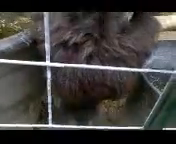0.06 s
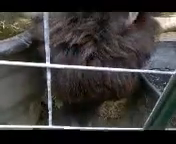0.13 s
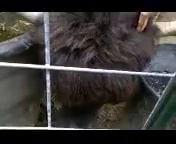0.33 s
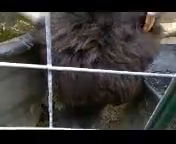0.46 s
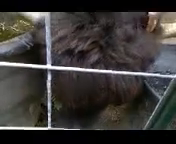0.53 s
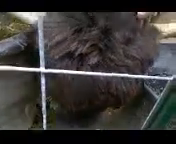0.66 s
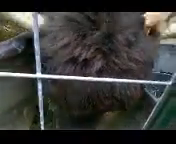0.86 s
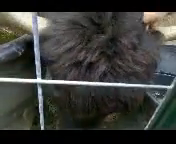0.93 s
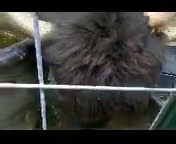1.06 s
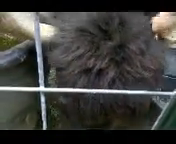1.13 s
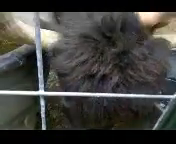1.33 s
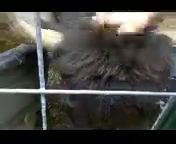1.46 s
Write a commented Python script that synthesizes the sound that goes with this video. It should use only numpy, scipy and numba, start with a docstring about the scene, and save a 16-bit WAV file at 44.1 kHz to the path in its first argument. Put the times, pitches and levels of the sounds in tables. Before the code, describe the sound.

A big animal hoots low and breathily, about four times a second, then fades; a distant shrill screech swells early and returns at the end, with faint chirps, a small knock, rustles and wind over hiss.

```python
"""A steady hiss opens the scene, with a far shrill screech swelling up in it; then a large animal gives four rising
hoots and a faint fifth in a hard-walled yard. Bird chirps, a small knock, rustle, wind puffs and low tones lie around.
Voices are sums of harmonics and gated noise sent through resonances; hiss, rustle, knock and puffs are filtered noise;
decaying noise tails give the yard echo. Two close microphone ports are cross-subtracted for width."""
import sys
import numpy as np
from scipy import signal
from scipy.fft import rfft, irfft, next_fast_len
from scipy.io import wavfile
from scipy.ndimage import uniform_filter1d
from numba import njit

SR = 44100
rng = np.random.default_rng(int(sys.argv[2]) if len(sys.argv) > 2 else 0)


def gain_from_decibels(decibels):
    """Convert decibel values to linear amplitude factors."""
    exponent = np.asarray(decibels, float) / 20
    return 10 ** exponent


def unload_wav(signal):
    """Save mono or channel-first audio to the path in sys.argv[1] as 16-bit WAV at rate SR, clipped to [-1, 1]."""
    wavfile.write(
        sys.argv[1],
        SR,
        np.round(np.clip(np.atleast_2d(signal).T, -1, 1) * 32767).astype(np.int16),
    )


N = 66150  # samples


@njit
def svf(x, hz, width):
    """Second-order resonance: a state-variable band-pass with gain 1 at its centre."""
    y, band, low = np.empty(len(x)), 0., 0.
    g, damping = np.tan(np.pi * hz / SR), width / hz
    for i in range(len(x)):
        v = (band + g * (x[i] - low)) / (1 + g * (g + damping))
        band, low, y[i] = 2 * v - band, low + 2 * g * v, damping * v
    return y


def body(x, table):
    """Modal superposition: resonances side by side (f/Hz, width/Hz, level/dB), each passed twice for steep skirts."""
    out = 0
    for hz, width, db in table:
        once = svf(x, 1. * hz, 1. * width)
        out = out + gain_from_decibels(db) * svf(once, 1. * hz, 1. * width)
    return out


def walk(rate):
    """Band-limited random modulation: levels held 1 / rate s and slewed twice; spread near 1."""
    k = int(SR / rate)
    held = np.repeat(rng.standard_normal(N // k + 1), k)
    return 1.3 * uniform_filter1d(uniform_filter1d(held, k), k)[:N]


def phase(hz, depth, rate):
    """Frequency modulation: phase in radians as the integral of a randomly wavering pitch."""
    return 2 * np.pi * np.cumsum(hz * (1 + depth * walk(rate))) / SR


def column(rows, index):
    """Piecewise-linear contour: one column of a time table, joined by straight lines."""
    rows = np.array(rows, float)
    return np.interp(np.arange(N) / SR, rows[:, 0], rows[:, index])


def bump(start, length):
    """Raised-cosine envelope: a smooth swell and fall (both arguments in s)."""
    return np.sin(np.pi * np.clip((np.arange(N) / SR - start) / length, 0, 1)) ** 2


# spectral density of the hiss common to both ports, and of that unlike between them
# columns: f/Hz, nominal level/(dB per Hz)
COMMON_HISS = [(25, -113), (60, -89), (125, -81), (180, -70.5), (250, -86.5), (500, -95.5), (1000, -100),
               (2000, -108), (4000, -107), (8000, -106), (10500, -105), (13500, -107)]
UNLIKE_HISS = [(25, -108), (60, -104), (125, -104), (250, -106), (500, -104), (1000, -107), (2000, -108),
               (4000, -108), (8000, -108), (10500, -108), (13500, -108)]


def hiss(table):
    """Filtered random noise: half-octave bands that swell together and flicker alone."""
    out, swell, table = 0, walk(1.545), np.array(table, float)
    for hz in 25 * 2 ** np.arange(0, 9.3, .5):
        density_db = np.interp(np.log(hz), np.log(table[:, 0]), table[:, 1])
        db = density_db + 2.0 * swell + 1.2 * walk(10.34)
        out = out + gain_from_decibels(db) * body(rng.standard_normal(N), [(hz, hz / 2, 0)])
    return out * np.sqrt(SR / 2)  # from density to full-band noise


# low puffs of wind; columns: centre t/s, length/s, f/Hz, relative level/dB
PUFFS = [(0.137, 0.057, 90, -49), (0.424, 0.086, 95, -43), (.49, 0.083, 55, -48), (0.997, 0.092, 90, -48),
         (1.17, 0.27, 93, -54), (1.31, .07, 130, -53), (1.357, 0.14, 110, -57.5)]


def puffs():
    """Flow noise: swells of low band-passed noise."""
    out = 0
    for centre, length, hz, db in PUFFS:
        rumble = body(rng.standard_normal(N), [(hz, hz, 20)])
        out = out + gain_from_decibels(db) * bump(centre - length / 2, length) * rumble
    return out


# short wavering tones; columns: start t/s, length/s, mean f/Hz, mean peak level/dB
HUMS = [(0, 0.21, 240, -59.5), (0.037, 0.2, 1009, -70), (0.369, 0.28, 1036, -62.5), (1.292, 0.17, 716, -70),
        (0.231, 0.12, 180, -52), (1.223, 0.091, 535, -52.5)]


def hums():
    """Narrow-band random modulation: short low tones far off waver in pitch and level."""
    out = 0
    for start, length, hz, db in HUMS:
        level = gain_from_decibels(db + 3.7 * walk(24.5)) * bump(start, length)
        out = out + level * np.cos(phase(hz, 0.01473, 25.15))
    return out


# bird chirps; columns: start t/s, length/s, mean f/Hz, mean peak level/dB
CHIRPS = [(0.715, 0.11, 7570, -63), (0.881, 0.096, 7700, -64), (0.886, 0.052, 8300, -63.5),
          (1.133, .06, 7600, -67), (1.15, .04, 8600, -74)]


def chirps():
    """Sinusoidal tone bursts, fluttering fast in pitch and level."""
    out = 0
    for start, length, hz, db in CHIRPS:
        level = gain_from_decibels(db) * bump(start, length) * gain_from_decibels(4.6 * walk(400))
        out = out + level * np.cos(phase(hz, 0.03, 700))
    return out


# contacts of the knock; columns: centre t/s, relative level/dB
KNOCKS = [(0.7954, -45), (0.7995, -47), (0.806, -40), (0.81, -52)]
# what the contacts ring with; columns: f/Hz, width/Hz, level/dB
KNOCK_BODY = [(1530, 650, -1), (2000, 530, -12), (4650, 2700, -11), (7000, 2800, -13)]


def knock():
    """Impulsive excitation of modes: soft noisy contacts make broad resonances ring."""
    contact_s = 0.0023
    ticks, scrape = np.zeros(N), rng.standard_normal(N)
    for centre, db in KNOCKS:
        ticks += 3.3 * gain_from_decibels(db) * bump(centre - contact_s / 2, contact_s) * scrape
    return body(ticks, KNOCK_BODY)


# rustles in the treble; columns: start t/s, length/s, relative level/dB
RUSTLES = [(0.41, 0.11, -55), (0.59, 0.097, -53.5), (0.796, 0.054, -54.5), (0.963, 0.035, -56),
           (1.211, 0.035, -52), (1.234, 0.098, -48), (1.315, 0.038, -55), (1.475, 0.042, -52)]


def rustle():
    """Amplitude-modulated noise: gritty treble in separate swells."""
    grit = rng.standard_normal(N) * gain_from_decibels(1.5 * walk(300))
    swells = sum(gain_from_decibels(db) * bump(start, length) for start, length, db in RUSTLES)
    return body(grit, [(13930, 20000, 0)]) * swells


# contour of the screech; columns: t/s, pitch f/Hz, relative level/dB
SCREECH = [(0, 1171, -79), (.04, 1175, -67), (.15, 1185, -66.5), (.22, 1213, -64), (.3, 1220, -63),
           (.4, 1255, -66.5), (.52, 1233, -72.5), (.64, 1244, -78), (1.17, 1408, -84), (1.2, 1326, -73.5),
           (1.23, 1191, -65.5), (1.35, 1215, -64), (1.43, 1217, -64), (1.5, 1254, -60.5)]
# its harmonics; columns: order, mean level/dB
SCREECH_ORDERS = [(1, -14), (2, -4.5), (3, -5), (4, -6), (5, 1.5), (6, -8.5)]
# its breath bands; columns: f/Hz, width/Hz, relative level/dB
SCREECH_BREATH = [(2667, 580, -6.5), (3805, 540, -5.5), (4786, 2020, -9), (6300, 450, -5),
                  (7105, 1940, -9.5)]


def screech():
    """Harmonic series with sidebands: fast amplitude modulation puts rasp around each line, with breath noise added."""
    jitter, rasp_db = 0.012, -7.5
    turn = phase(column(SCREECH, index=1), jitter, 60)
    stack = 0
    for order, db in SCREECH_ORDERS:
        rasp = 1 + gain_from_decibels(rasp_db) * walk(900)
        stack = stack + gain_from_decibels(db + 3.1 * walk(25)) * np.cos(order * turn) * rasp
    breath = 10 * body(rng.standard_normal(N), SCREECH_BREATH)
    return gain_from_decibels(column(SCREECH, index=2)) * (stack + breath)


# one contour per hoot; columns: t/s, pitch f/Hz, relative level/dB, share of half-pitch lines (0-1)
HOOTS = [
    [(.195, 215, -62.5, 0.6), (.225, 254.6, -45.5, 0.53), (.25, 301, -39.5, 0.65),
     (.27, 322.8, -40.5, 0.07), (.3, 320, -37, 0.02), (.33, 313.6, -42, 0), (.345, 299, -54, 0.8),
     (.37, 311.4, -52.5, 0.5), (.39, 294, -49.5, 0.3)],
    [(.455, 200.3, -54, 0.25), (.49, 224.7, -42.5, 0.4), (.52, 282, -42.5, 0.44), (.545, 289.2, -40, 0.73),
     (.575, 287.3, -44.5, 0.53), (.595, 343.3, -38.5, 0.02), (.625, 341.7, -40, 0.4),
     (.645, 340, -50.5, 0.2), (.675, 335, -81, 0)],
    [(.73, 234.9, -59, 0.5), (.765, 256.9, -47.5, 0.57), (.805, 273.3, -42, 0.47), (.83, 333.5, -44, 0.26),
     (.87, 343.8, -43.5, 0.34), (.895, 331, -45.5, 0.74), (.925, 324, -47, 0.75), (.945, 325, -63, .3)],
    [(1.02, 234.7, -48.5, .3), (1.055, 256.9, -43.5, 0.33), (1.085, 272.2, -43, 0.2),
     (1.1, 297.8, -42.5, .5), (1.115, 345.8, -40.5, 0.08), (1.14, 333.7, -43.5, 0.65),
     (1.155, 323.6, -47, 1), (1.185, 323.5, -53.5, 0.7), (1.22, 286, -59, 0.7)],
    [(1.24, 319.6, -70, 0.1), (1.28, 326.2, -56, 0), (1.315, 249.3, -60, 0), (1.35, 249.2, -56, 0),
     (1.39, 333, -62, 0.28), (1.43, 274.5, -60.5, 0.2), (1.46, 199.3, -67, 0.4), (1.495, 151.2, -77, 0.36)],
]
# mouth of each hoot; columns: resonance f/Hz, its level/dB, level of the upper resonances/dB,
# shimmer depth/dB, relative breath level/dB
MOUTHS = [(636, 5.5, -3, 2.5, -7), (552, 3.5, -15, 3.0, -2.5), (540, -5.5, -13, 3.5, -0.5),
          (535, -2, -19.5, 2, -2.5), (535, -3, -17, 4.5, -1.5)]
# throat resonances: three of chest, then the upper ones that brighten an open-mouthed hoot
# columns: f/Hz, width/Hz, relative level/dB
THROAT = [(215, 55, 0.5), (340, 137.3, 6), (420, 178, -1), (793.5, 193, -10.5), (979, 336, -12),
          (1251, 333, -17.5), (1704, 700, -24.5)]


def hoots():
    """Source-filter principle: strong-weak glottal cycles give whole and half lines, breath is gated by the cycle."""
    jitter, hoarse_db = 0.03, 4  # pitch flutter; fast flutter that blurs the upper lines
    mouth_width_hz, muffle = 54, 1.07  # low resonances are cut above this multiple of the mouth's
    out, t = 0, np.arange(N) / SR
    for rows, (mouth_hz, mouth_db, bright_db, shimmer_db, breath_db) in zip(HOOTS, MOUTHS):
        half_turn = phase(column(rows, index=1) / 2, jitter, 90)
        half_share = column(rows, index=3)
        voice = 0
        for k in range(1, 17):  # odd k: lines between the harmonics
            share = half_share if k % 2 else 1
            voice = voice + share * gain_from_decibels(shimmer_db * walk(130)) * np.cos(k * half_turn + k * k)
        gate = 10 * np.cos(half_turn) ** 2
        voice = voice + gain_from_decibels(breath_db + 1.8 * walk(120)) * gate * rng.standard_normal(N)
        voice = voice * gain_from_decibels(column(rows, index=2)) * (t > rows[0][0]) * (t < rows[-1][0])
        low = body(voice, THROAT[:3] + [(mouth_hz, mouth_width_hz, mouth_db)])
        low = signal.sosfilt(signal.butter(4, muffle * mouth_hz, fs=SR, output="sos"), low)
        bright = body(voice * gain_from_decibels(hoarse_db * walk(400)), THROAT[3:])
        out = out + low + gain_from_decibels(bright_db) * bright
    return out


# a second, higher vibration that breaks into the hoots
# columns: start t/s, length/s, mean f/Hz, relative level/dB, level of its octave/dB
BREAKS = [(0.221, 0.068, 404.1, -32.5, -13.5), (0.503, 0.033, 428.7, -29, -29),
          (0.546, 0.051, 424, -31.5, -31), (0.737, 0.053, 420, -42.5, -31),
          (0.783, 0.029, 385, -37.5, -18.5), (1.034, 0.074, 427.3, -41.5, -25),
          (1.091, 0.034, 400, -39.5, -19)]


def voice_breaks():
    """Biphonation: a second vibration and its octave sound beside the main pitch."""
    out = 0
    for start, length, hz, db, octave_db in BREAKS:
        turn = phase(hz, 0.014, 60)
        tone = np.cos(turn) + gain_from_decibels(octave_db) * np.cos(2 * turn)
        out = out + gain_from_decibels(db + 2.2 * walk(61.7)) * bump(start, length) * tone
    return out


def yard(x):
    """Diffuse reverberation: two unrelated exponential tails of near unit energy; the treble dies first."""
    t60_s, treble_t60_s, split_hz, rise_s = 0.56, 0.35, 2600, 0.016
    t = np.arange(SR) / SR
    noise = rng.standard_normal((2, SR))
    bass = signal.sosfilt(signal.butter(1, split_hz, fs=SR, output="sos"), noise)
    tail = bass * gain_from_decibels(-60 * t / t60_s) + (noise - bass) * gain_from_decibels(-60 * t / treble_t60_s)
    tail = tail * np.minimum(t / rise_s, 1)
    tail = tail / np.sqrt(SR * t60_s / (2 * np.log(1000)))
    return signal.fftconvolve(x[None], tail, axes=1)[:, :N]


def delayed(x, lag_s):
    """Propagation delay: fractional-sample lag by linear interpolation."""
    t = np.arange(N)
    return np.interp(t - lag_s * SR, t, x)


def scene():
    """Superposition: sources, yard echo and hiss add at two ports that differ in arrival time and level."""
    calls, far = hoots() + voice_breaks() + hums(), screech()
    echo, far_echo = gain_from_decibels(-5.5) * yard(calls), gain_from_decibels(1.5) * yard(far)
    calls = calls + echo[0]
    ports = np.array([gain_from_decibels(4.5) * delayed(calls, 6e-5), calls])
    wind = puffs() * np.array([[-.4], [1]])  # mostly on the right port
    small = chirps() + knock() + rustle()
    near = np.array([delayed(small, 1.2e-5), small])
    common = far + far_echo[0] + hiss(COMMON_HISS)
    unlike = hiss(UNLIKE_HISS) + gain_from_decibels(-4.5) * echo[1] + gain_from_decibels(5.0) * far_echo[1]
    return ports + wind + common + near + unlike * np.array([[1], [-1]])


def roll_off(x):
    """The treble ends steeply here."""
    return signal.sosfilt(signal.butter(12, 14110, fs=SR, output="sos"), x)


def record(dry):
    """Pressure-gradient principle: each channel loses a delayed, dulled copy of the other; the top is cut."""
    cross_gain, notch_hz, dull_hz, top_hz = 0.9, 3005, 7400, 13950  # delay is 1 / notch_hz
    size = next_fast_len(N + 2048)
    f = np.arange(size // 2 + 1) * SR / size
    cross = cross_gain * np.exp(-2j * np.pi * f / notch_hz - (f / dull_hz) ** 4)
    spec = rfft(dry, size) * (f < top_hz)
    mix = irfft(spec - cross * spec[::-1], size)[:, :N]
    return roll_off(mix)


dry = scene()
out = record(dry)
unload_wav(out)
```